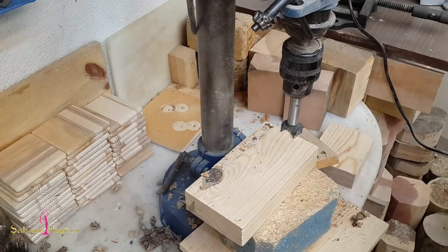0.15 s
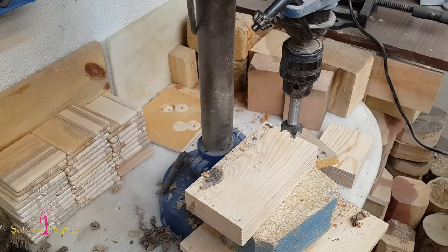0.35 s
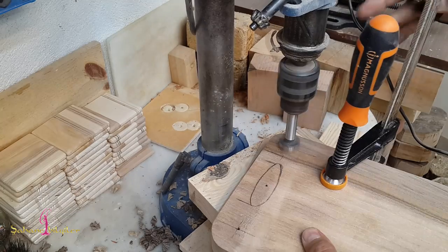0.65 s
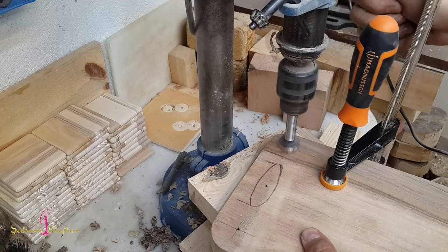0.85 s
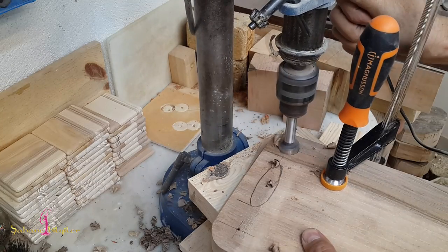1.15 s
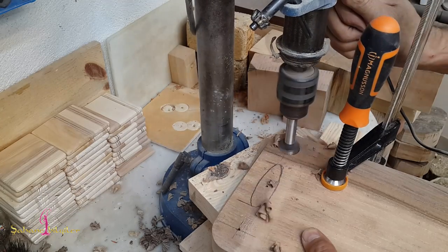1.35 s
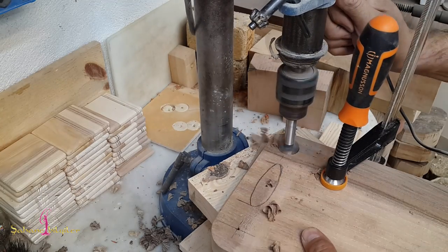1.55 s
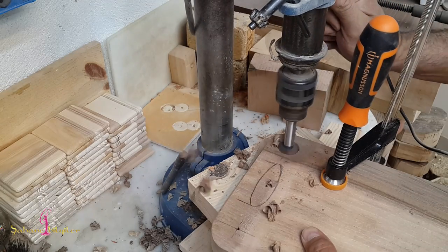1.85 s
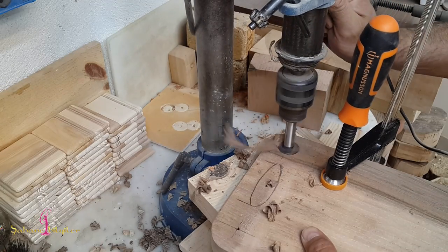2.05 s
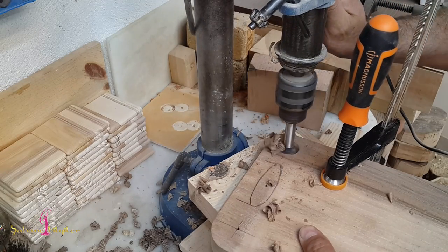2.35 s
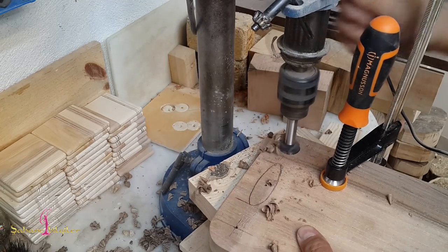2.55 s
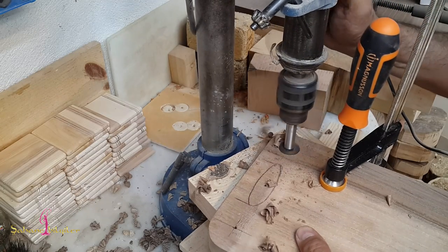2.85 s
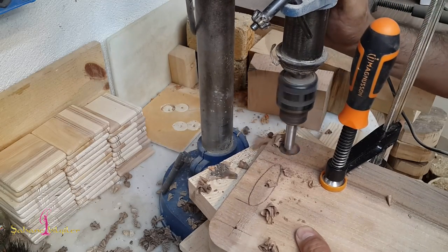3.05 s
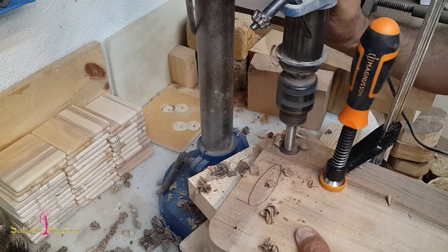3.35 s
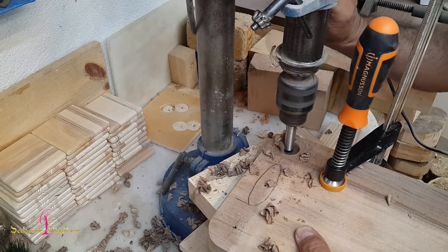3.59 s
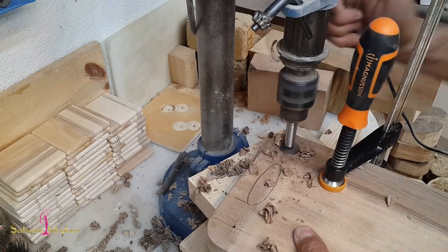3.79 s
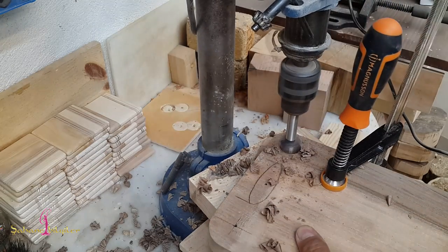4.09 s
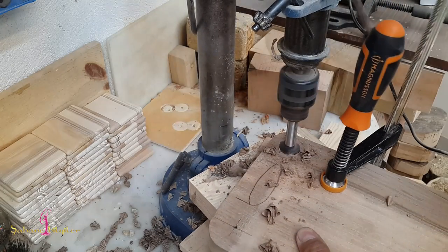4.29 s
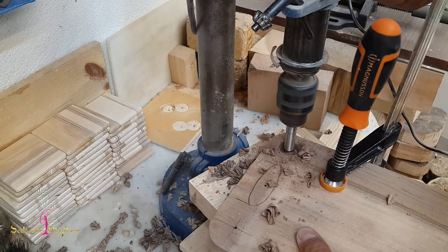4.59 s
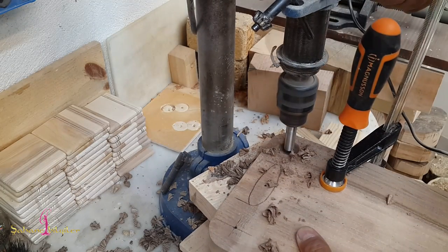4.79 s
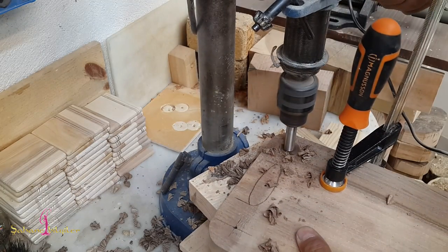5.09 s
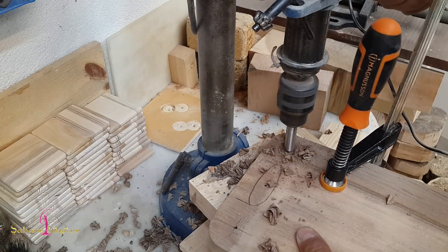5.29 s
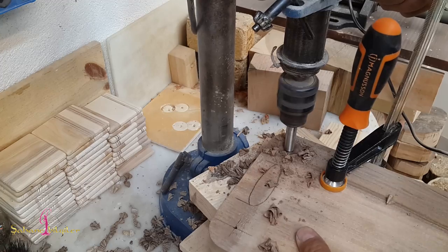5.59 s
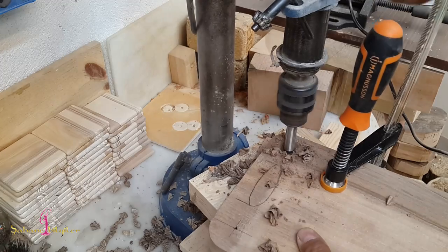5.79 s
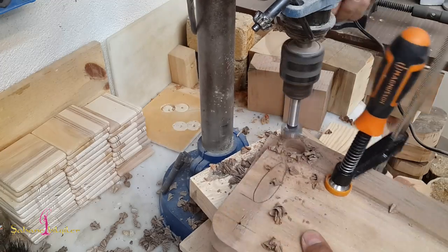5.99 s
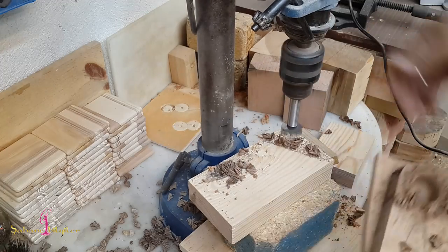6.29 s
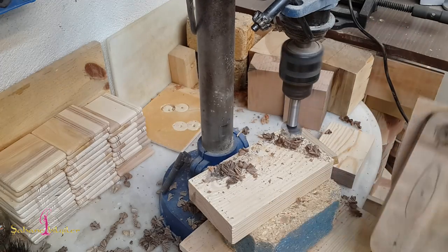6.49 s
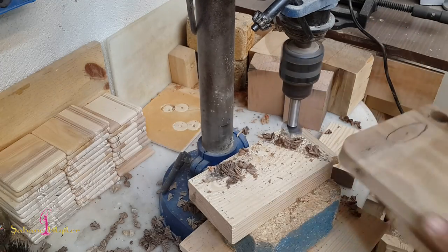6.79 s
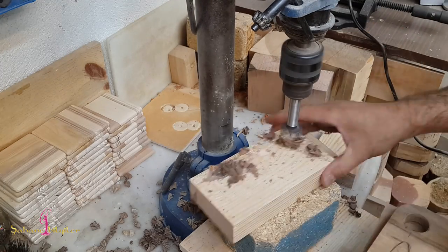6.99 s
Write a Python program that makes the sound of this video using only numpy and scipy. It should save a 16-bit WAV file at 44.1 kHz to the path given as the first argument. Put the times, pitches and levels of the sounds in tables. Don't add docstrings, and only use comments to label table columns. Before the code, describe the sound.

Very faint wood friction and light taps, then a sudden change to a running bench drill. The bit bites hardwood three times, with a harsh midrange rattle pulsing at each turn and bright tearing shavings. Lifts bring hard clunks, chirping squeaks and bearing whine; the busiest cluster precedes the third, deepest cut. It ends on a steady quieter idle with ticking parts, heard close up in stereo in a home workshop.

```python
import sys
import numpy as np
from scipy import signal
from scipy.fft import rfft, irfft, next_fast_len
from scipy.io import wavfile
from scipy.ndimage import uniform_filter1d, map_coordinates

SR = 44100
rng = np.random.default_rng(int(sys.argv[2]) if len(sys.argv) > 2 else 0)


def voltage_ratio(decibels):
    exponent = np.asarray(decibels, float) / 20
    return 10 ** exponent


def generate_wav(signal):
    frames = np.transpose(np.atleast_2d(signal))
    scaled = np.clip(frames, -1, 1) * 32767
    pcm = np.round(scaled).astype(np.int16)
    wavfile.write(sys.argv[1], SR, pcm)


N = 314874

START_S, TOP_HZ = .712, 15900

# (time [s], level [dB])
SLIDE_DB = [
    (0.0, -83),
    (0.102, -80),
    (0.376, -79.5),
    (0.6, -74.5),
    (0.7, -83.5),
]
# (time [s], peak [dB], bright part [dB], length [s])
HANDLING = [
    (0.112, -58, -10, 0.041),
    (0.237, -61, 1, 0.022),
    (0.27, -63, -4, 0.024),
    (0.352, -64, -8, 0.03),
    (0.384, -67, -4, 0.032),
    (0.44, -67, 9, 0.028),
    (0.467, -63.5, 8, 0.022),
]
# (frequency [Hz], density [dB per Hz])
WOOD_COLOUR = [(12, -29), (20, 18), (32, -29), (107, -36), (294, -14), (390, -18), (620, -12), (1210, -12),
               (2500, -20), (3250, -42), (5500, -120)]
# (frequency [Hz], density [dB per Hz])
DUST_COLOUR = [(1180, -36), (2000, -10), (4340, -2.5), (6530, -4), (7060, -3), (14800, -4.5), (16000, -14)]
# (frequency [Hz], width [Hz], level [dB])
PLANK_MODES = [(396, 60, -6), (850, 90, -4.5), (1180, 38, -6), (1630, 150, -9), (2680, 150, -11)]
# (frequency [Hz], width [Hz], level [dB])
SCRAPE_MODES = [(1195, 40, -77)]
SCRAPE_S, SCRAPE_HALF_S = .34, .09

# (time [s], speed [turns Hz])
SPINDLE_HZ = [(.72, 41.45), (.97, 41.45), (1.1, 39.2), (2.42, 39.9), (2.52, 41.58), (2.75, 41.58),
              (3.0, 40.05), (3.55, 40), (3.82, 41.58), (4.3, 41.58), (4.55, 40.4), (5, 40.65), (5.5, 40.55),
              (5.8, 40.75), (5.95, 41.58), (7.14, 41.58)]
IDLE_HZ, BALLS_PER_TURN, NICK_PASS_S = 41.58, 6.22, 5.8636
# (frequency [Hz], width [Hz], level [dB])
FRAME_MODES = [(1416, 50.5, -4.5), (1486, 64, -3), (1562, 50, -6.5), (1672, 66, -3), (1786.4, 27.3, 2)]
# (frequency [Hz], width [Hz], level [dB])
BOARD_MODES = [(1952, 79, -3.5), (2108, 55, -1.5), (2256, 90, -1.5), (2338, 68, -1.5), (2521, 51, -1.5),
               (2592, 37, -0.5), (2704, 68, 1), (2925, 93, -8.5), (3578, 66, -4), (3667, 16.4, -0.5)]
# (frequency [Hz], width [Hz], level [dB])
SHANK_MODES = [(4184, 36, 1), (4280, 33, 0), (4388, 34, 6), (4570, 200, -14.5), (5590, 46, -11.5)]
# (frequency [Hz], width [Hz], level [dB])
HOUSING_MODES = [(410, 69, -13.5), (521, 48, -6), (637.6, 47, -2), (723, 9.4, 3.5), (818, 47.6, 2),
                 (1042, 72, -4), (1247, 103, -5.5)]
# (frequency [Hz], width [Hz], level [dB])
NICK_MODES = [(8730, 510, 9), (10050, 500, 9)]
# (frequency [Hz], width [Hz], level [dB])
HOLE_MODES = [(1228, 31, 2), (1318, 51, 3)]
# (frequency [Hz], width [Hz], level [dB])
LOOSE_MODES = [(5760, 90, -2), (6840, 90, -7), (8060, 77, 6.5), (10040, 240, -9), (11300, 230, -3),
               (13400, 400, -15)]
# (frequency [Hz], width [Hz], level [dB])
BELT_MODES = [(1701, 60, -40.5), (5605, 80, -46.5)]
BELT_LAP_S, BELT_PASS_S = .0935, 6.6
# (frequency [Hz], density [dB per Hz])
CHIPS_COLOUR = [(700, -28), (1100, -2.5), (1300, -2.5), (2000, -2.5), (3000, 0), (5000, 3), (6200, 1.5),
                (6900, 3), (8000, -2), (9200, 0), (11300, 0.5), (13000, -3), (15500, -2), (16000, -23)]
# (frequency [Hz], density [dB per Hz])
SPRAY_COLOUR = [(5000, -33), (7500, -8), (11000, -6), (15800, -2.5)]
# (frequency [Hz], density [dB per Hz])
RUN_COLOUR = [(150, -60), (300, -12.5), (600, -4.5), (1100, -4), (2000, -17.5), (3000, 6.5), (4300, 9.5),
              (4900, -24), (5400, -14), (5600, 8), (5800, -8), (7000, 1.5), (10500, -50), (15800, -1)]
# (frequency [Hz], density [dB per Hz])
THUD_COLOUR = [(12, -1), (25, -5.5), (100, -10), (160, -9), (220, -3.5), (320, -6), (480, -4.5), (650, -40),
               (1100, -120)]

# (multiple of ball rate, level [dB], gain with play [dB/dB], loss with load [dB/Hz])
WHINE = [(10, -46, 0.6, .93), (16, -47, 1.86, 9), (13, -54, 0.3, 0), (15, -58, -0.8, 0)]
# (time [s], play [dB])
PLAY_DB = [(.72, 1), (.91, -8), (2.52, -6), (2.67, 4.5), (2.8, -7), (3.82, 3), (4.01, -2), (4.11, 4.5),
           (4.4, -4), (5.95, 1), (6.1, -0.5), (6.22, 2.5), (6.38, -0.5), (6.53, 2), (6.88, -0.5),
           (6.96, -1.5), (7.07, 4), (7.14, 0)]
# (frequency [Hz], level [dB])
HUM = [(1696, -68), (1998, -55), (2550, -62.5)]
# (frequency [Hz], level [dB])
DRONE = [(400, -68), (732.6, -62.5), (835, -63.5)]
# (time [s], frequency [Hz], level [dB], half length [s])
SWELLS = [(.8, 400, -61, 0.11), (0.856, 3352, -48.5, 0.085), (0.843, 835, -52, 0.04),
          (3.096, 732.6, -52, 0.097), (3.1, 835, -60, 0.15), (3.885, 732.6, -56, 0.17),
          (3.885, 835, -48, 0.31), (4.65, 835, -58, 0.73), (5.08, 732.6, -48.5, 0.29),
          (5.907, 645, -44.5, 0.028), (5.97, 620, -44, 0.033), (6.192, 732.6, -52, 0.14),
          (6.3, 835, -60, 0.54), (6.2, 400, -59, .06), (6.8, 400, -66, 0.53)]
# (time [s], peak [dB], bright part [dB], T60 [s])
KNOCKS = [(0.8285, -23, -25, 0.038), (0.9754, -38, 5, 0.066), (1.0026, -23, 3, 0.059),
          (2.5186, -27, -35, 0.3), (2.568, -26.5, -20, 0.07), (2.634, -24.5, -9.5, 0.15),
          (2.7292, -16.5, -11, 0.038), (2.7916, -30, 1, 0.057), (3.8767, -22, -12, 0.11),
          (3.9516, -16.5, -14, 0.055), (3.964, -19, -6, 0.056), (4.0224, -19.5, -4.5, 0.091),
          (4.116, -17.5, -3, 0.066), (4.199, -21.5, -2.5, 0.054), (4.21, -15.5, -6.5, 0.064),
          (4.226, -12, -10, 0.043), (4.2614, -40, -18, 0.053), (4.338, -23.5, -8, 0.08),
          (4.3839, -19.5, -10, 0.097), (4.41, -19.5, -31, 0.045), (5.838, -31, -15, 0.03),
          (5.896, -23.5, -26, 0.13), (5.9725, -25.5, 4, 0.054), (5.9854, -22.5, -20, 0.058),
          (6.0276, -24.5, -14, 0.082), (6.168, -27, -26, 0.065), (6.333, -28, -17, 0.054),
          (6.4386, -36, 3, 0.18), (7.012, -20, -10, 0.032)]
AFTERFALL_DB, AFTERFALL_LONGER = -15, 2.7
# (time [s], peak [dB], pitch [Hz], T60 [s], roughness [0-1])
SQUEAKS = [(2.5027, -20, 11000, .03, .3), (2.7511, -15, 11500, .03, .1), (2.757, -27, 11600, .12, .1),
           (2.7751, -22, 11500, .02, .12), (2.7511, -26, 7800, .02, .15), (4.4223, -16, 10300, .03, .15),
           (4.428, -22, 9600, .15, .3), (5.8391, -19, 8700, .015, .3), (5.8636, -18, 8620, .015, .3),
           (6.0656, -27, 10400, .012, .4), (6.1145, -29, 10800, .012, .4), (6.152, -29, 6500, .015, .25),
           (6.1629, -29, 10700, .012, .4), (6.422, -31, 5700, .015, .3), (6.695, -33, 10000, .012, .4),
           (7.012, -33, 9300, .015, .3), (7.13, -33, 9500, .012, .4)]

# (touch [s], time to bite [s], hand backs off [s], lifts clear [s])
PLUNGES = [
    (.975, 0.037, 2.37, 2.5),
    (2.79, 0.042, 3.6, 3.83),
    (4.418, 0.13, 5.76, 5.885),
]
# (frame [dB], board [dB], shank [dB], chips [dB], thud [dB])
SHAKE_DB = [
    [(-30.5, -34, -34.5, -30.5, -62), (-35, -38, -31.5, -32, -71)],
    [(-33.5, -41.5, -31, -31.5, -71), (-40.5, -38, -40.5, -31.5, -65.5)],
    [(-34, -31.5, -41.5, -31.5, -73), (-32.5, -31, -41, -32, -67.5)],
]
# (bite depth [0-1], nick tick [dB], flying chips [dB], hole ring [dB])
GRIP = [
    [(.4, -81, -35, -63), (.6, -34.5, -31.5, -49)],
    [(.2, -36, -72, -69), (.4, -37, -65, -63)],
    [(.6, -37, -66, -51), (1.1, -37.5, -38, -39.5)],
]
BITE_SHAPE = (1.4, 1.1, 1.7, 0.68, 0.74)
# (frame, board, shank, chips, thud [dB])
BACK_OFF_DB = (-6, -1.5, -10, -1.5, -5)
# (nick, flying chips, hole ring [dB])
FREE_DB = (-55.5, -53, -63)
# (level [dB], gain with rub [dB/dB])
FREE_RUN = [(-40, 1), (-45, 0.58), (-49.5, 0.47), (-48.5, 1), (-75.5, 1)]
# (time [s], level [dB])
RUB_DB = [(.72, -4), (.83, 0.5), (.96, -1), (2.51, 4), (2.79, 2), (3.84, 2.5), (3.9, 5), (4.0, 2.5),
          (4.19, 2.5), (4.23, 8), (4.28, 6.5), (4.4, 3), (5.89, 2), (5.98, 6), (6.1, -1.5), (6.33, -1),
          (6.38, -1.5), (7.14, -2.5)]
RELEASE_S, FREE_GRIP = 0.056, 0.33
FIRST_CHIPS_DB, FIRST_CHIPS_T60_S = -26, .6
DUSTING_DB_PER_S = 0.78
HOUSING_DB, HOUSING_LOAD_DB, HOUSING_RUB_DB_PER_DB = -45, 0.5, 0.49
SNAP_LAG_TURNS, SNAP_DB, SNAP_GROWS_DB, SNAP_DIES_DB = .58, 1, 17, 60
SAME_GRAIN, GRAIN_TURNS = 0.42, 7.5

# (frequency [Hz], correlation [-1 to 1])
ALIKE = [(60, .4), (300, 0.87), (700, 0.93), (1700, 0.98), (2300, 0.58), (4400, 0.51), (6500, 0.2),
         (8000, 0.96), (15000, 0.99)]
# (frequency [Hz], left over right [dB])
BALANCE_DB = [(125, 0), (250, 0), (600, 1.6), (1200, 1), (2400, -1), (4400, .9), (8000, -0.6)]
# (frequency [Hz], phase [rad])
PATHS_RAD = [(1200, 0.046), (2500, 0.78), (5000, 0.88), (7500, 0.52)]
PATH_HZ = 350
GAP_BASE, GAP_GAIN = .02, 11


def along(points, hz):
    f, v = np.transpose(points)
    return np.interp(np.log(hz + 1), np.log(f + 1), v)


def curves(rows):
    s, *cols = np.transpose(rows)
    return [np.interp(np.arange(N) / SR, s, c) for c in cols]


def wobble(rate_hz):
    knots = rng.standard_normal(int(N * rate_hz / SR) + 4)
    return map_coordinates(knots, [np.arange(N) * rate_hz / SR])


def colour(spectrum):
    return lambda hz: voltage_ratio(along(spectrum, hz))


def modes(table):
    def response(f):
        total = 0
        for k, (centre, width, db) in enumerate(table):
            damping = 1j * f * width
            total = total + (-1) ** k * voltage_ratio(db) * damping / (centre * centre - f * f + damping)
        return total
    return response


def shaken(force, response, alike=ALIKE, noise=lambda: rng.standard_normal((2, N))):
    m = next_fast_len(N + SR // 4)
    hz = np.fft.rfftfreq(m, 1 / SR)
    gain = response(hz)
    turn = np.arccos(np.clip(along(alike, hz), -1, 1)) / 2
    mid, side = rfft(force * noise(), m) * gain * [np.cos(turn), np.sin(turn)]
    scatter = map_coordinates(rng.standard_normal(SR // PATH_HZ), [hz / PATH_HZ])
    lead_rad = along(PATHS_RAD, hz) * scatter
    tilt = voltage_ratio(along(BALANCE_DB, hz) / 2) * np.exp(.5j * lead_rad)
    pair = irfft([(mid + side) * tilt, (mid - side) / tilt], m)[:, :N]
    return pair / np.sqrt(np.mean(np.abs(gain) ** 2))


def bursts(times_s, levels_db, t60s, attack_s):
    force, t = np.zeros(N + SR), np.arange(SR // 3) / SR
    for s, db, t60 in zip(times_s, levels_db, t60s):
        force[round(s * SR):][:len(t)] += voltage_ratio(db - 60 * t / t60) * (1 - np.exp(-t / attack_s))
    return force[:N]


def joined(a, b):
    return 10 * np.log10(a ** 2 + b ** 2)


def handling():
    drag_db, = curves(SLIDE_DB)
    s, db, bright_db, length_s = np.transpose(HANDLING)
    wood = voltage_ratio(drag_db + 1.5 * wobble(60.0)) + bursts(s, db - 7.5, 3 * length_s, attack_s=0.004)
    dust = voltage_ratio(drag_db + 2.0 + 2.3 * wobble(92))
    dust = dust + bursts(s, db + bright_db + 2, 3 * length_s, attack_s=0.0027)
    swell_db = -6 * ((np.arange(N) / SR - SCRAPE_S) / SCRAPE_HALF_S) ** 2
    edge = voltage_ratio(SCRAPE_MODES[0][2] + swell_db + 3 * wobble(30))
    out = shaken(edge, modes(SCRAPE_MODES))
    out = out + voltage_ratio(-1) * shaken(wood, colour(WOOD_COLOUR))
    out = out + voltage_ratio(-3.5) * shaken(wood, modes(PLANK_MODES))
    return out + shaken(dust, colour(DUST_COLOUR))


def turns():
    total = np.cumsum(curves(SPINDLE_HZ)[0]) / SR
    return total - total[round(NICK_PASS_S * SR)]


def contact():
    t = np.arange(N) / SR
    touch, bite, back, lift = np.transpose(PLUNGES)[:, :, None]
    gate = np.clip((t - touch) / bite, 0, 1) * np.clip((lift - t) / RELEASE_S, 0, 1)
    easing = np.sqrt(np.clip((t - back) / (lift - back), 0, 1)) * (t < lift)
    return gate.sum(0), easing.sum(0), np.where(t > touch, t - touch, 9).min(0)


def deepening(table):
    rows = []
    for (touch, _, _, lift), (first, last) in zip(PLUNGES, table):
        rows += [(touch, *first), (lift, *last)]
    return np.array(curves(rows))


def shaking():
    gate, easing, _ = contact()
    free_db, follows = np.transpose(FREE_RUN)[:, :, None]
    free_db = free_db + follows * curves(RUB_DB)[0]
    free_db[3] += DUSTING_DB_PER_S * np.arange(N) / SR
    cut_db = deepening(SHAKE_DB) + np.array(BACK_OFF_DB)[:, None] * easing
    return joined(voltage_ratio(free_db), gate ** np.array(BITE_SHAPE)[:, None] * voltage_ratio(cut_db))


def grip():
    gate, _, since_s = contact()
    depth, *levels_db = deepening(GRIP)
    cut = voltage_ratio(levels_db)
    cut[1] += voltage_ratio(FIRST_CHIPS_DB - 60 * since_s / FIRST_CHIPS_T60_S)
    depth = FREE_GRIP + gate * (depth - FREE_GRIP)
    return depth, *joined(voltage_ratio(FREE_DB)[:, None], gate * cut)


def motor():
    housing_db = HOUSING_DB + HOUSING_LOAD_DB * contact()[0] + HOUSING_RUB_DB_PER_DB * curves(RUB_DB)[0]
    thud_db = shaking()[4]
    out = shaken(voltage_ratio(housing_db - 2.0 + 1.0 * wobble(80)), modes(HOUSING_MODES))
    out = out + shaken(voltage_ratio(thud_db + 7.5 + 3.96 * wobble(7)), colour(THUD_COLOUR))
    out = out + shaken(voltage_ratio(-43.5 + 0.43 * wobble(40) + 0.71 * wobble(3.3)), colour(RUN_COLOUR))
    balls, t = BALLS_PER_TURN * turns(), np.arange(N) / SR
    load_hz = IDLE_HZ - curves(SPINDLE_HZ)[0]
    play_db = curves(PLAY_DB)[0]
    tones = [(k * balls, db + follows * play_db - seated * load_hz) for k, db, follows, seated in WHINE]
    tones += [(f * t, db) for f, db in HUM + DRONE]
    tones += [(f * t, db - 6 * ((t - s) / half) ** 2) for s, f, db, half in SWELLS]
    for cycles, db in tones:
        lead_rad = rng.normal(0, 0.092) * np.array([[1], [-1]])
        level = np.sqrt(2) * voltage_ratio(db + 1.8 * wobble(9))
        out = out + level * np.sin(2 * np.pi * cycles + 0.52 * wobble(25) + lead_rad)
    return out


def rattle():
    when, size = rng.random((190, 2)).T
    jolts = bursts(N / SR * when, -47 - 5 * np.log(size + 0.029), np.full(len(when), .02), attack_s=0.00038)
    lap = np.cos(np.pi * (np.arange(N) / SR - BELT_PASS_S) / BELT_LAP_S) ** 4 * voltage_ratio(2.3 * wobble(10))
    out = shaken(jolts + voltage_ratio(-69), modes(LOOSE_MODES))
    for part in BELT_MODES:
        out = out + shaken(voltage_ratio(part[2]) * lap, modes([part]))
    return out


def knocks():
    s, db, bright_db, t60 = np.transpose(KNOCKS)
    jolt = bursts(s, db, t60, attack_s=0.0008)
    spit = bursts(s, db + bright_db - 0.5, t60, attack_s=0.00043)
    trickle = bursts(s, db + bright_db + AFTERFALL_DB, AFTERFALL_LONGER * t60, attack_s=0.008)
    out = voltage_ratio(-7.0) * shaken(jolt, modes(FRAME_MODES))
    out = out + voltage_ratio(-8.0) * shaken(jolt, modes(BOARD_MODES))
    out = out + voltage_ratio(-14.0) * shaken(jolt, modes(HOUSING_MODES))
    out = out + voltage_ratio(-14.5) * shaken(jolt, modes(SHANK_MODES))
    return out + shaken(spit + trickle, colour(CHIPS_COLOUR))


def grain():
    age = (turns() - turns()[0]) / GRAIN_TURNS
    layer = age.astype(int)
    spot = (turns() % 1 * (SR // IDLE_HZ)).astype(int)
    wood = rng.standard_normal((2, 100, SR // 40))
    fade = np.pi / 2 * (age % 1)
    again = np.cos(fade) * wood[:, layer, spot] + np.sin(fade) * wood[:, layer + 1, spot]
    share = SAME_GRAIN * contact()[0]
    return np.sqrt(share) * again + np.sqrt(1 - share) * rng.standard_normal((2, N))


def bites(fibres, depth, depth_db, uneven_db, lag_turns, rough_db, own_db):
    angle = 2 * np.pi * (turns() - lag_turns)
    swing_db = depth * (depth_db * np.cos(2 * angle) + uneven_db * np.cos(angle))
    force = voltage_ratio(swing_db + rough_db * fibres + own_db * wobble(200))
    return force / np.sqrt(np.abs(uniform_filter1d(force ** 2, size=SR // 8)))


def boring():
    frame_db, board_db, shank_db, chips_db, _ = shaking()
    fibres = wobble(160)
    depth, nick_db, spray_db, hole_db = grip()

    force = voltage_ratio(frame_db + 0.2) * bites(fibres, depth, depth_db=4.0, uneven_db=0.5, lag_turns=0.018,
                                        rough_db=1.64, own_db=0.2)
    out = shaken(force, modes(FRAME_MODES), noise=grain)
    force = voltage_ratio(board_db + 1.26) * bites(fibres, depth, depth_db=7.5, uneven_db=2.0, lag_turns=0.037,
                                         rough_db=0.4, own_db=0.7)
    out = out + shaken(force, modes(BOARD_MODES), noise=grain)
    force = voltage_ratio(shank_db + 2.5) * bites(fibres, depth, depth_db=3.0, uneven_db=-2.0, lag_turns=0.069,
                                        rough_db=-0.3, own_db=3.0)
    out = out + shaken(force, modes(SHANK_MODES))
    force = voltage_ratio(chips_db + 1.64) * bites(fibres, depth, depth_db=1.0, uneven_db=-2.2, lag_turns=0.032,
                                         rough_db=0.5, own_db=1.5)
    out = out + shaken(force, colour(CHIPS_COLOUR))

    snap_db = board_db + SNAP_DB + SNAP_GROWS_DB * (depth - 1)
    snap = voltage_ratio(snap_db + 1.2 * wobble(40) - SNAP_DIES_DB * ((turns() - SNAP_LAG_TURNS) % 1))
    out = out + shaken(snap, modes(BOARD_MODES), noise=grain)
    out = out + voltage_ratio(-6) * shaken(snap, modes(FRAME_MODES), noise=grain)

    tick = voltage_ratio(nick_db + 7.5 + 0.83 * wobble(40) - 44 * (turns() % 1))
    spray = voltage_ratio(spray_db + 2.4 * wobble(21.77))
    out = out + shaken(tick, modes(NICK_MODES))
    out = out + shaken(spray, colour(SPRAY_COLOUR), alike=[(5000, -1.4)])
    return out + shaken(voltage_ratio(hole_db), modes(HOLE_MODES))


def squeaks():
    out, t = np.zeros((2, N + SR)), np.arange(SR // 8) / SR
    for s, db, hz, t60, rough in SQUEAKS:
        steps = rough * rng.standard_normal(len(t)) + 0.095 * rng.standard_normal((2, len(t)))
        wander_rad = np.cumsum(steps, axis=1)
        envelope = voltage_ratio(db - 60 * t / t60) * (1 - np.exp(-t / 0.00018))
        out[:, round(s * SR):][:, :len(t)] += envelope * np.sin(2 * np.pi * hz * t + wander_rad)
    return out[:, :N]


def scene():
    running = np.arange(N) >= START_S * SR
    machine = motor() + rattle() + knocks() + boring() + squeaks()
    return np.where(running, machine, handling())


def treble_gaps(x, patchy_db):
    hz, t, z = signal.stft((x[0] + x[1]) / 2, SR, nperseg=1024)
    band, frame = (hz // 690).astype(int), np.arange(len(t)) // 4
    luck, slip = rng.random((2, band[-1] + 1, frame[-1] + 1))[:, band][:, :, frame]
    flying = voltage_ratio(np.interp(t * SR, np.arange(N), grip()[2]))
    treble = np.clip((hz[:, None] - 6500) / 6500, 0, 1.3) ** 1.5
    share = (GAP_BASE + GAP_GAIN * flying) * treble
    power = uniform_filter1d(uniform_filter1d(np.abs(z) ** 2, size=24, axis=0), size=7, axis=1)
    quiet = power < 2 * np.median(power[hz > 6500], axis=0)
    uneven = voltage_ratio(patchy_db * (2 * slip - 1) * (hz[:, None] > 5000))
    gain = np.where((luck < share) & quiet, .01, uneven)
    mid = signal.istft(z * gain, SR, nperseg=1024)[1][:N]
    side = (x[0] - x[1]) / 2
    return np.array([mid + side, mid - side])


def low_pass(x):
    return signal.sosfilt(signal.butter(12, 16260, fs=SR, output="sos"), x)


def record(dry):
    m = next_fast_len(N)
    passed = np.fft.rfftfreq(m, 1 / SR) < TOP_HZ
    kept = irfft(rfft(dry, m) * passed, m)[:, :N]
    mix = treble_gaps(kept, patchy_db=3.5)
    return low_pass(mix)


dry = scene()
out = record(dry)
generate_wav(out)
```